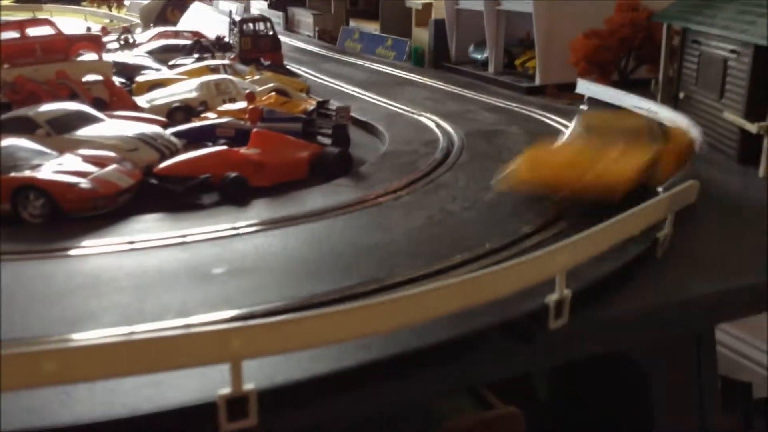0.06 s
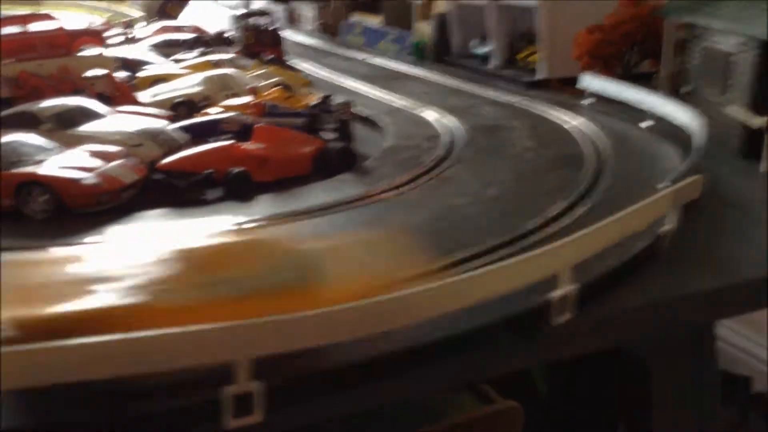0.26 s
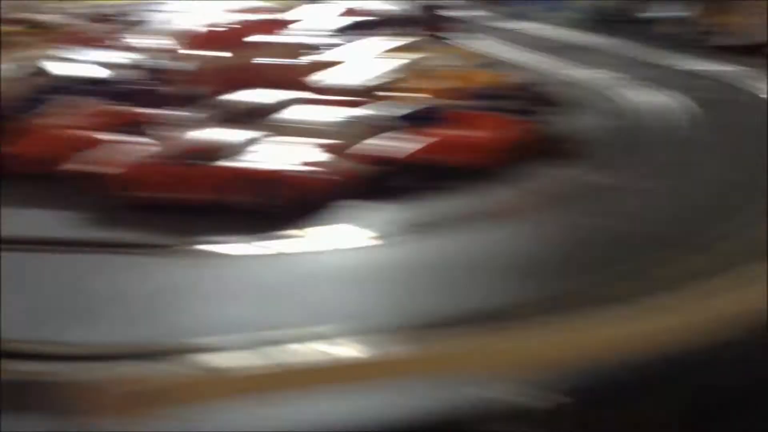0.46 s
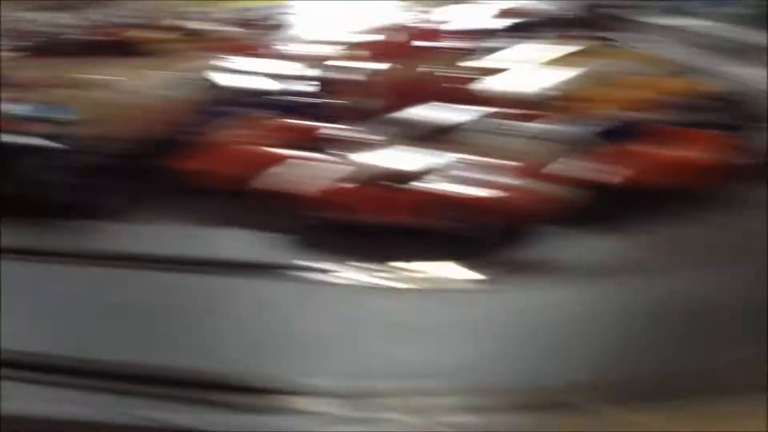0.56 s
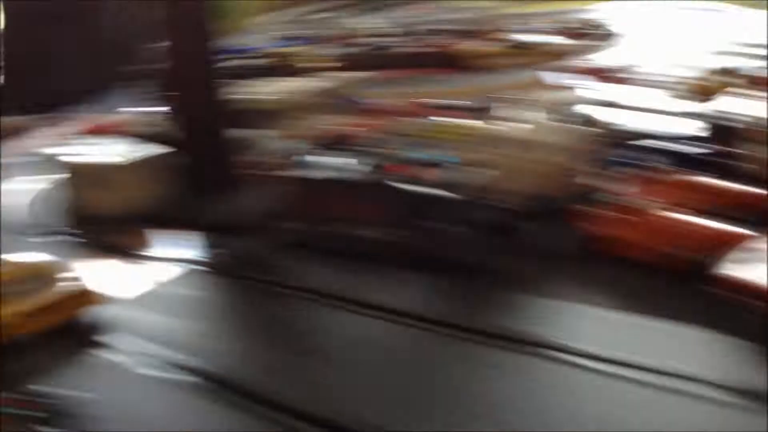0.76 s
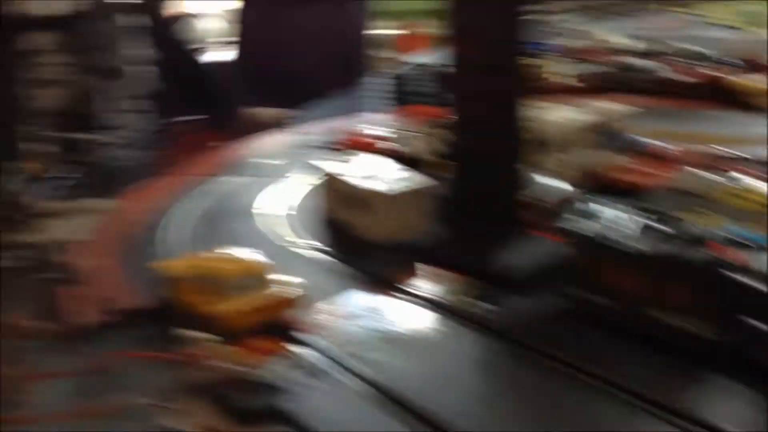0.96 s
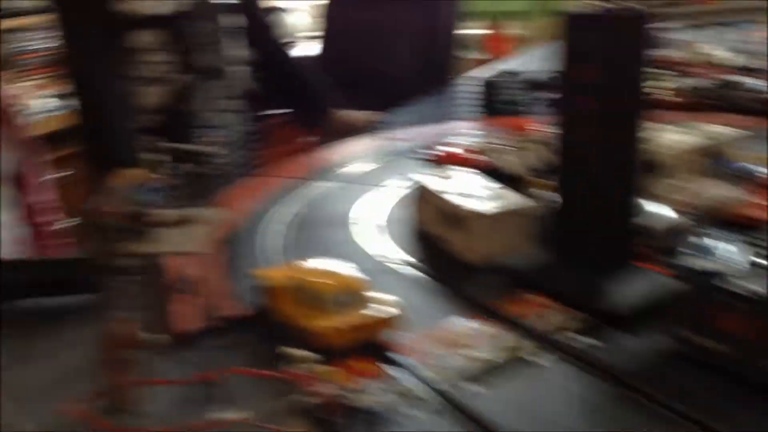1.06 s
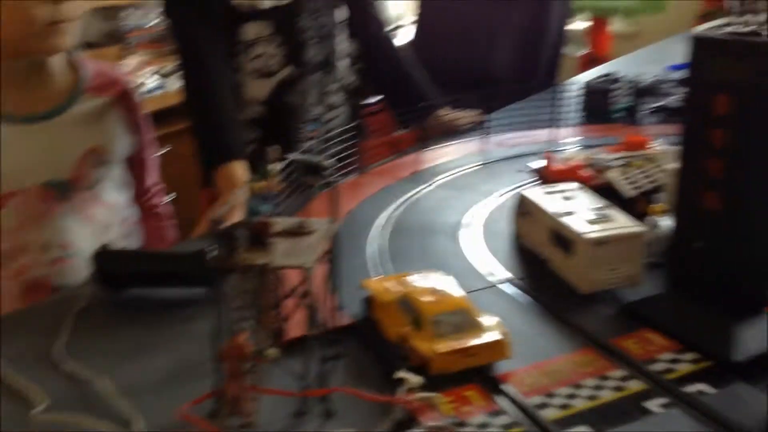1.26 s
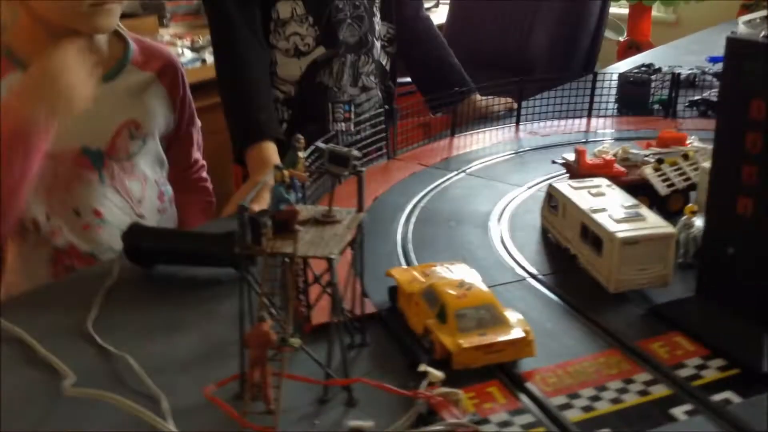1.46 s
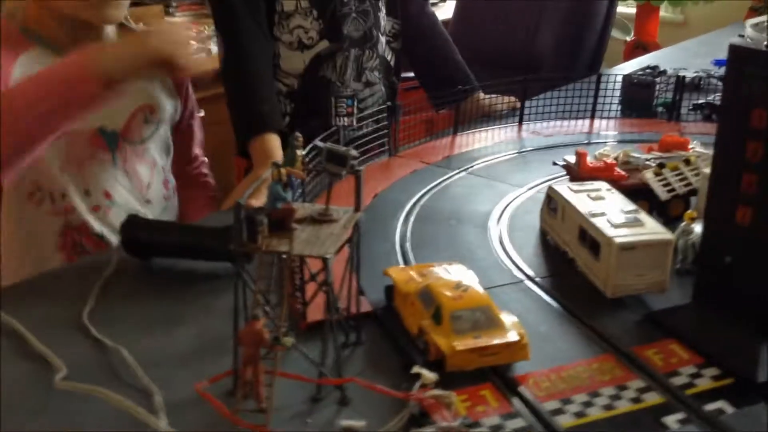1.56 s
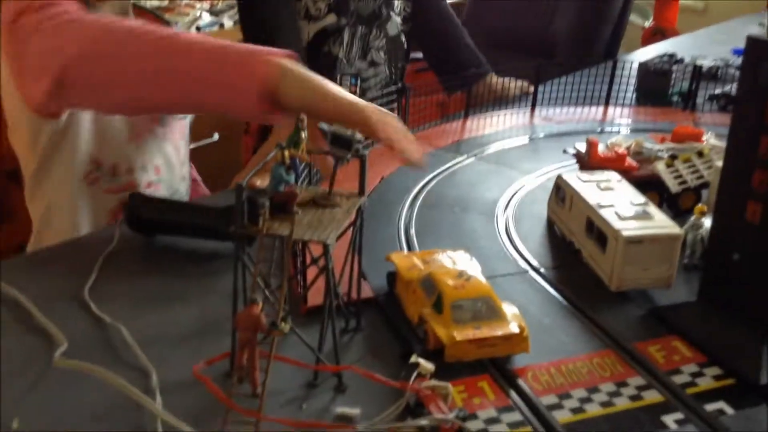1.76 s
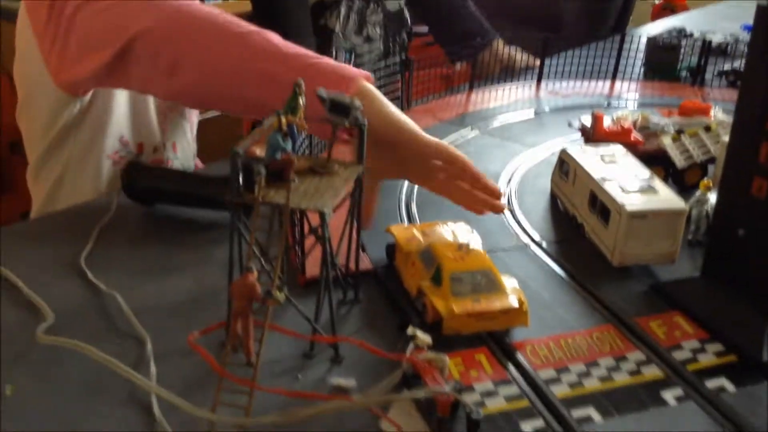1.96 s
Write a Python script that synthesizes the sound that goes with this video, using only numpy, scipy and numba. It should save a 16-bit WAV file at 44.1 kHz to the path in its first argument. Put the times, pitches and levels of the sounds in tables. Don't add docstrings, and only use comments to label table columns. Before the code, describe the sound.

A toy electric slot car rushes by close, with bright scraping hiss, buzzing rattle and sharp joint clacks, fading to a stop within a second; another car hisses faintly far off in a furnished room, phone microphone.

```python
import sys
import numpy as np
from scipy import signal
from scipy.fft import rfft, irfft
from scipy.io import wavfile
from scipy.ndimage import uniform_filter1d
from numba import njit

SR = 44100
rng = np.random.default_rng(int(sys.argv[2]) if len(sys.argv) > 2 else 0)


def attenuation_scalar(level_db):
    decades = np.asarray(level_db, float) / 20
    return 10 ** decades


def transcribe(u):
    v = np.clip(np.atleast_2d(u).T, -1, 1)
    q = np.round(v * 32767).astype(np.int16)
    wavfile.write(sys.argv[1], SR, q)


N = 88773
t = np.arange(N) / SR


def unit(x):
    return x / np.sqrt(np.mean(x ** 2))


def noise():
    return rng.standard_normal(N)


def curve(points, col):
    points = np.array(points)
    return np.interp(t, points[:, 0], points[:, col])


@njit
def svf(x, hz, width):
    y = np.empty(len(x))
    b, l = 0., 0.
    for i in range(len(x)):
        g = np.tan(np.pi * hz[i] / SR)
        k = width / hz[i]
        v = (b + g * (x[i] - l)) / (1 + g * (g + k))
        b = 2 * v - b
        l = l + 2 * g * v
        y[i] = k * v
    return y


def band(x, hz, width_hz):
    return svf(x + 1e-18, hz + 0 * t, 1. * width_hz)


def colour(x, spectrum):
    points = np.array(spectrum)
    log_hz = np.log(np.arange(N // 2 + 1) * SR / N + 1)
    gain_db = np.interp(log_hz, np.log(points[:, 0]), points[:, 1])
    return irfft(rfft(x) * attenuation_scalar(gain_db), N)


def walk(rate_hz):
    hold = int(SR / rate_hz)
    steps = np.repeat(rng.standard_normal(N // hold + 1), hold)
    return 1.3 * uniform_filter1d(uniform_filter1d(steps, hold), hold)[:N]


def grit(per_s, spread_db):
    chance = rng.random(N)
    strength = np.minimum(rng.exponential(size=N), 4.5)
    rub = noise()
    hits = np.clip((per_s / SR - chance) * SR / per_s * 4, 0, 1)
    return unit(hits * attenuation_scalar(spread_db * strength) * np.sign(rub) + .3 * rub)


def decay(start_s, tau_s):
    return (t >= start_s) * np.exp(-np.clip(t - start_s, 0, 9) / tau_s)


def crack(start_s, hz):
    snap_s, tail_s, tail_db = 0.0017, .012, -10
    env = decay(start_s, snap_s) + attenuation_scalar(tail_db) * decay(start_s, tail_s)
    width_hz = np.minimum(1.6 * hz, 4500.)
    return unit(band(band(noise(), hz, width_hz), hz, width_hz)) * env


def table(push):
    # hz, level_db, t60_s
    modes = [(177, -10, 0.23), (203, -2, 0.15), (243, -6, .1), (320, -5.5, 0.11), (390, 4, 0.068),
             (444, -5, 0.066), (530, -4.5, 0.12), (805, 12.5, 0.047)]
    ring = 0
    for hz, db, t60_s in modes:
        ring = ring + attenuation_scalar(db) * np.exp(-np.log(1000) * t / t60_s) * np.sin(2 * np.pi * hz * t)
    return signal.fftconvolve(push, ring)[:N]


def braids(push):
    # hz, level_db
    scrape_colour = [(150, -33.5), (800, -19.5), (4200, -10.5), (5400, -8), (6600, -5.5), (8100, -4),
                     (10500, -9.5), (15500, -24.5)]
    ring_hz = 8210 * (1 + .035 * walk(22.17))
    ring = unit(band(push, ring_hz, 1800)) * attenuation_scalar(-8)
    spark_hz, spark_width_hz, spark_db = 12900, 4500, -26
    fizz = unit(band(band(push, spark_hz, spark_width_hz), spark_hz, spark_width_hz))
    fizz = fizz * attenuation_scalar(spark_db + 4.0 * walk(16.3))
    return unit(unit(colour(push, scrape_colour)) + ring + fizz)


def room_floor():
    # hz, level_db
    hush_colour = [(25, -35.5), (70, -37), (130, -10), (220, -3), (420, -8), (1600, -7), (5000, -10.5),
                   (15000, -35)]
    return unit(colour(noise(), hush_colour)) * attenuation_scalar(-54)


def room_echo(x):
    t60_s, wet_db, first_echo_s = .3, -15, 0.0067
    tail = noise() * decay(first_echo_s, t60_s / np.log(1000))
    return attenuation_scalar(wet_db) * signal.fftconvolve(x, tail / np.sqrt(np.sum(tail ** 2)))[:N]


def far_car():
    # start_s, hiss_db, drone_hz
    far = [
        (0, -38, 320),
        (1.1, -44.5, 300),
        (1.4, -45.5, 301),
        (1.72, -48.5, 265),
        (1.79, -50.5, 245),
        (2.02, -54, 215),
    ]
    hiss = braids(grit(15700, 2.2)) * attenuation_scalar(curve(far, 1) + 1.0 * walk(20))
    hz = curve(far, 2)
    width_hz, drone_db, throb_db = 100, -59, 2.
    drone = band(band(noise(), hz, width_hz), hz, 1.14 * width_hz)
    drone = drone / np.sqrt(uniform_filter1d(drone ** 2, size=3000))
    return hiss + unit(drone) * attenuation_scalar(drone_db + throb_db * walk(30.14))


def plastic_ticks():
    # start_s, level_db, centre_hz
    ticks = [
        (1.694, -43, 8800),
        (1.75, -47, 1160),
        (1.9994, -43.5, 1600),
        (2.001, -40.5, 710),
    ]
    return sum(attenuation_scalar(db) * crack(s, hz) for s, db, hz in ticks)


def track_joints():
    # start_s, thump_db, crack_db, crack_centre_hz
    joints = [(.049, -50, -13, 8000), (0.085, -52, -15, 6800), (0.187, -59, -9.5, 6900),
              (0.25, -46, -23, 2500), (0.351, -30, -13, 2500), (0.402, -45, -19.5, 2540),
              (.47, -40, -23, 2520), (0.502, -46, -12, 2700), (0.664, -52, -21, 2550),
              (0.87, -43.5, -36, 1500), (0.898, -46.5, -49, 1500)]
    out = 0
    for s, thump_db, crack_db, hz in joints:
        thump = table(decay(s, 0.018) * noise()) / 30
        out = out + attenuation_scalar(thump_db) * thump + attenuation_scalar(crack_db) * crack(s, hz)
    return out


def armature():
    start_hz, sag_hz_per_s, turn_jitter, gate_db = 106.4, 8, 0.077, 0.5
    turn_hz = (start_hz - sag_hz_per_s * t) * (1 + turn_jitter * walk(62.6))
    phase = 2 * np.pi * np.cumsum(turn_hz) / SR
    return attenuation_scalar(gate_db * (np.cos(phase) + 0.43 * np.cos(2 * phase)))


def shell_rattle(beat):
    # hz, width_hz, level_db
    resonances = [(610, 430, -17), (740, 140, -10.5), (948, 85, 0), (1082, 120, 0), (1326, 250, -1),
                  (1700, 470, -5.5), (2074, 360, 0.5), (2320, 170, -4), (2570, 245, 1.5), (2900, 220, -3),
                  (3260, 750, -4)]
    tilt_db_per_oct_s = -1.5
    shake = grit(2170, 2.5) * beat * attenuation_scalar(1.17 * walk(89.95))
    out = 0
    for k, (hz, width_hz, db) in enumerate(resonances):
        mode_db = db + 0.91 * walk(30.6) + tilt_db_per_oct_s * t * np.log2(hz / 1500)
        moving_hz = hz * (1 + 0.022 * walk(15.8))
        mode = unit(band(band(shake, hz, 2 * width_hz), moving_hz, width_hz))
        out = out + (-1) ** k * attenuation_scalar(mode_db) * mode * np.sqrt(width_hz)
    return unit(out)


def wheel_wobbles():
    # start_s, length_s, shell_lift_db, ringing_hz, scrape_lift_db
    wobbles = [(0.016, .012, 0, 2570, 5), (0.06, 0.0087, 7, 2570, 1), (.077, 0.0068, 8.5, 2570, 4.5),
               (0.153, 0.004, 21.5, 2588, 4), (0.17, 0.0054, 12, 1700, 4.5), (0.195, .005, 9, 6450, 4.5),
               (0.244, 0.017, 10, 1065, 2.5), (0.28, 0.013, 7, 2552, 2.5), (0.329, 0.012, 7, 2552, 2),
               (0.351, 0.017, 5.5, 1007, 0), (0.415, .004, -3, 2630, 1), (0.426, 0.013, 9, 1075, -1),
               (0.455, 0.0082, 3, 2170, -1), (0.526, 0.0077, 6, 2500, 2.5), (0.557, 0.0072, -3, 1955, 2.5),
               (0.614, 0.012, 2, 1435, 0.5), (0.675, 0.024, -5, 749, -2), (0.725, 0.019, -1.5, 1091, -1),
               (0.773, 0.0092, 1, 2220, -2.5), (0.802, 0.0072, 5.5, 2194, -2.5),
               (0.823, .006, 4.5, 2410, -1), (0.84, 0.027, -3.5, 753, 0.5), (.858, .006, 2.5, 1047, -4),
               (0.89, 0.02, 4.5, 1483, 0)]
    ring_db, ring_waver_rad = 1.5, .7
    lift_db, press_db, rings = 0, 0, 0
    for s, length_s, shell_db, hz, scrape_db in wobbles:
        bump = np.exp(-.5 * ((t - s) / length_s) ** 2)
        lift_db = lift_db + 0.56 * shell_db * bump
        press_db = press_db + scrape_db * bump
        tone = np.sin(2 * np.pi * hz * t + ring_waver_rad * walk(121.5))
        rings = rings + attenuation_scalar(shell_db + ring_db) * bump * tone / 2
    return lift_db, press_db, rings


def near_car():
    # start_s, scrape_db, shell_db (relative to the scrape)
    run = [(0, -15.5, -5), (.09, -17, -9.5), (.105, -16, -10), (.14, -14.5, -16.5), (.2, -15.5, -13.5),
           (.3, -16, -10.5), (.46, -17.5, -9.5), (.485, -20.5, -5), (.57, -20.5, -5.5), (.63, -24.5, -1),
           (.69, -27.5, 2.5), (.73, -32, -2.5), (.76, -30.5, -2.5), (.82, -39, 6), (.86, -39.5, 2.5),
           (.9, -37, -3.5), (.97, -47, 3), (1.04, -56, 4)]
    beat = armature()
    scrape = braids(grit(9500, 2) * beat) * attenuation_scalar(0.67 * walk(30) + 1.02 * walk(149.7))
    shell = shell_rattle(beat)
    lift_db, press_db, rings = wheel_wobbles()
    roll_db = -31 + 5.0
    roll = unit(table(noise())) * attenuation_scalar(roll_db)
    body = shell * attenuation_scalar(lift_db) + rings + roll
    stop_fade = np.clip((run[-1][0] - t) / 0.073, 0, 1)
    level = attenuation_scalar(curve(run, 1)) * stop_fade
    return level * (scrape * attenuation_scalar(press_db) + attenuation_scalar(curve(run, 2)) * body) + track_joints()


def scene():
    near = near_car() + plastic_ticks()
    cars = near + room_echo(near) + far_car()
    bass_cut = signal.butter(5, 149, "high", fs=SR, output="sos")
    return (signal.sosfilt(bass_cut, cars) + room_floor())[None]


def roll_off(x):
    return signal.sosfilt(signal.butter(12, 15880, fs=SR, output="sos"), x)


def record(dry):
    rounded = 1.05 * np.tanh(dry / 1.05)
    x = signal.sosfilt(signal.butter(4, 105, "high", fs=SR, output="sos"), rounded)
    x = x + unit(band(noise(), 90, 70)) * attenuation_scalar(-85 + 2.5 * walk(12))
    x = signal.sosfilt(signal.ellip(10, .2, 50, 15330, fs=SR, output="sos"), x)
    return roll_off(x)


dry = scene()
out = record(dry)
transcribe(out)
```